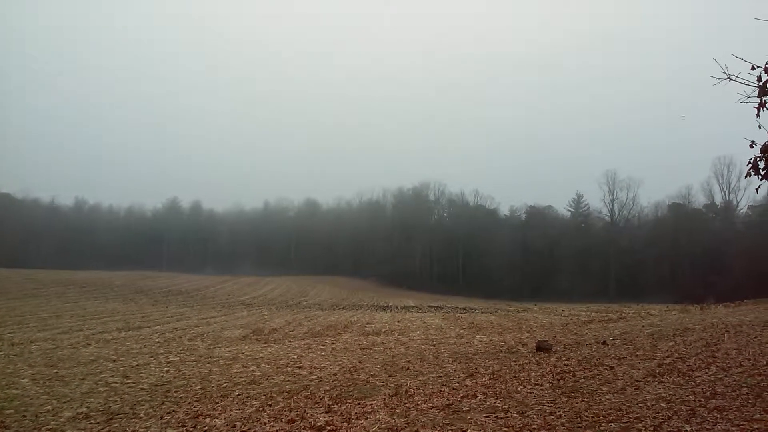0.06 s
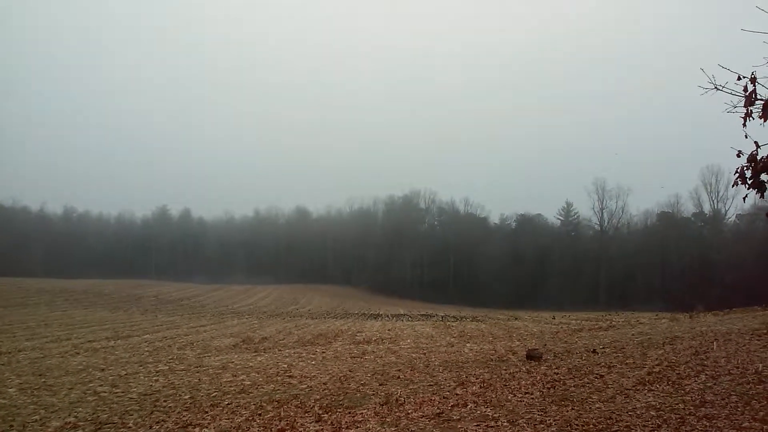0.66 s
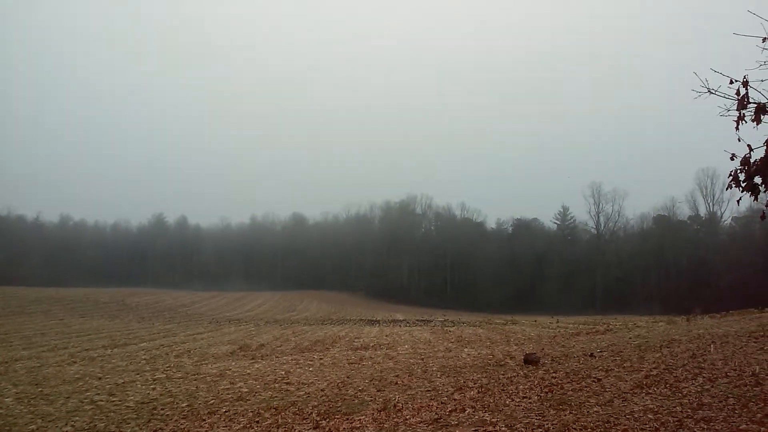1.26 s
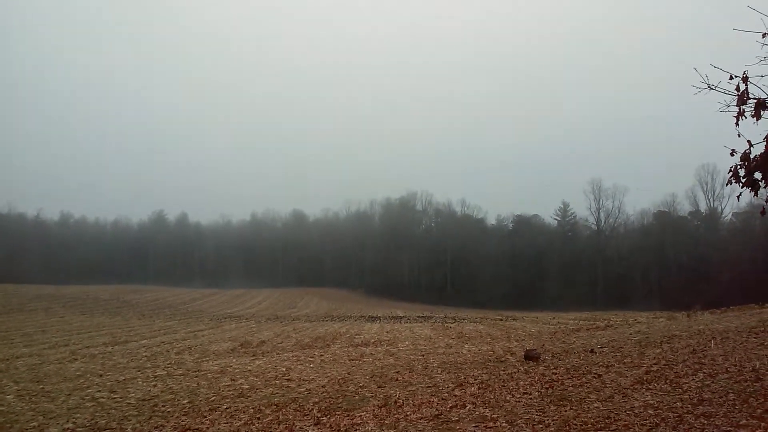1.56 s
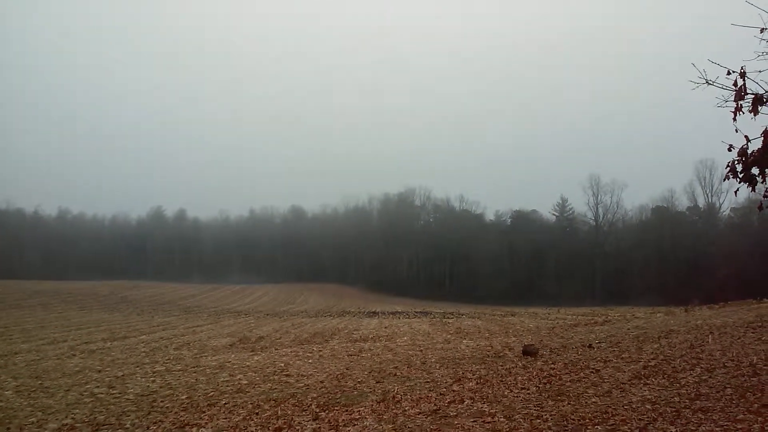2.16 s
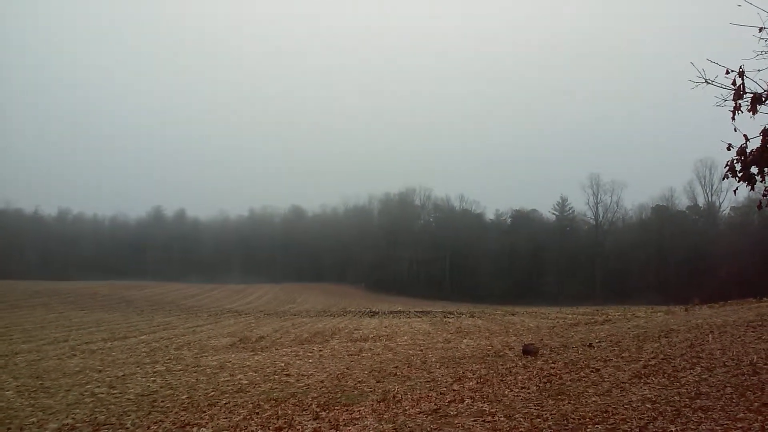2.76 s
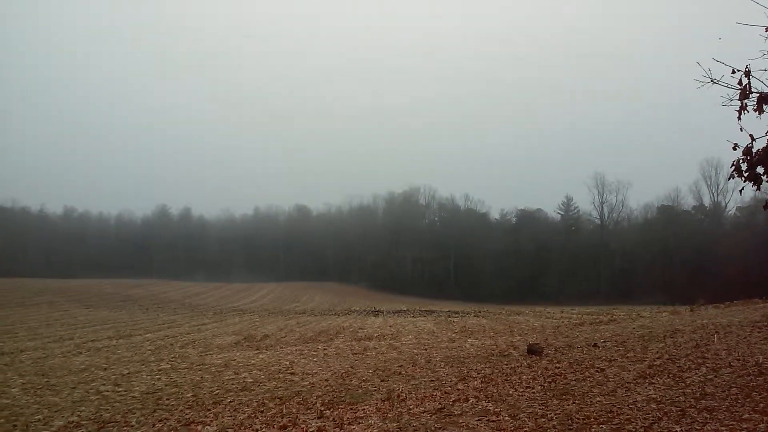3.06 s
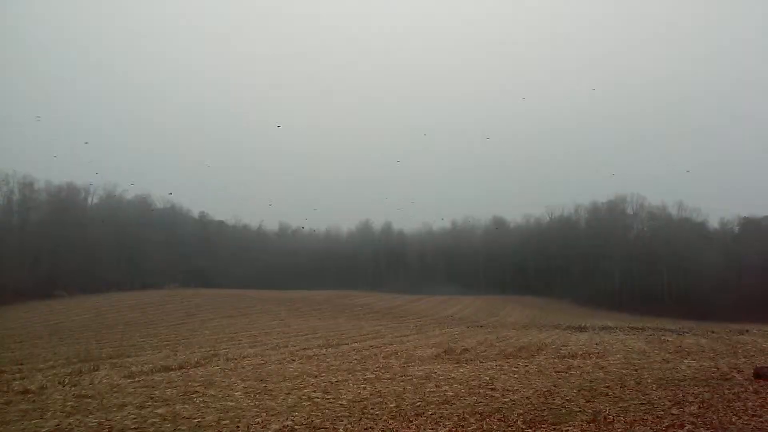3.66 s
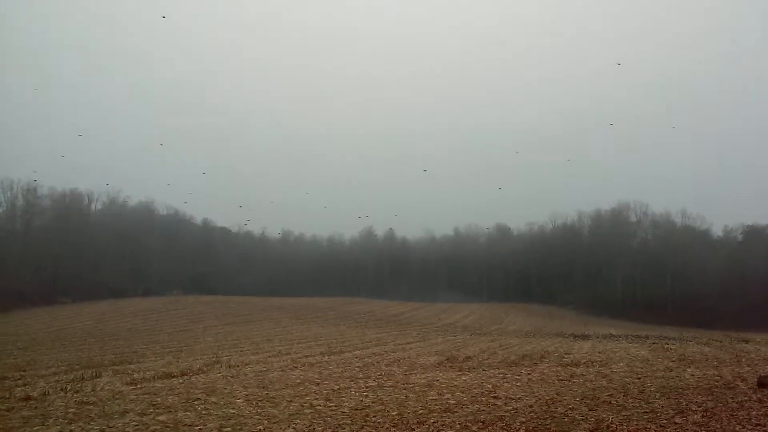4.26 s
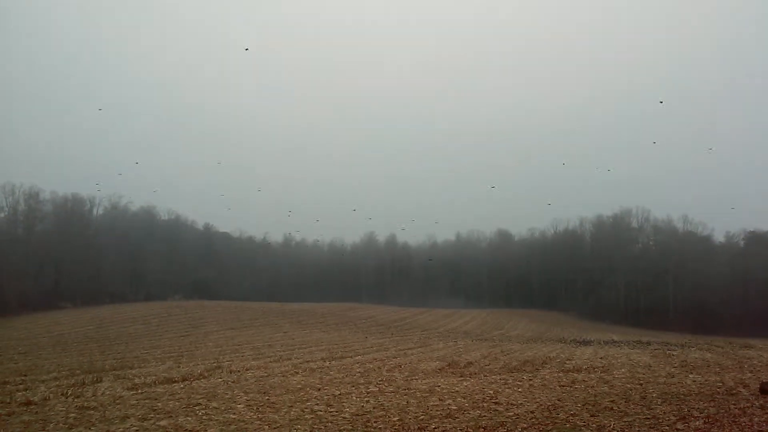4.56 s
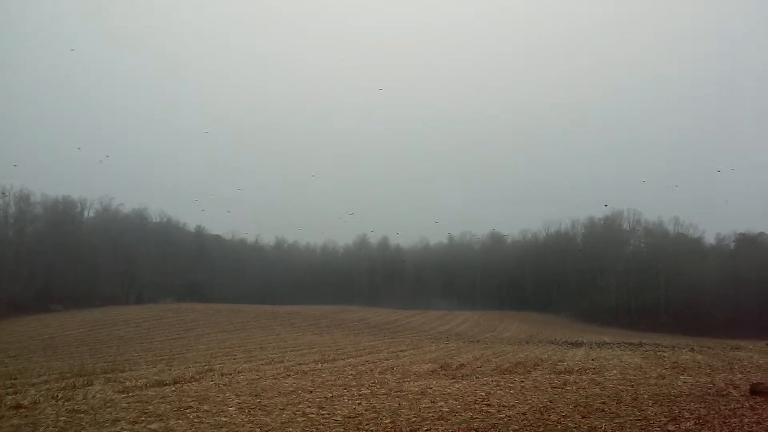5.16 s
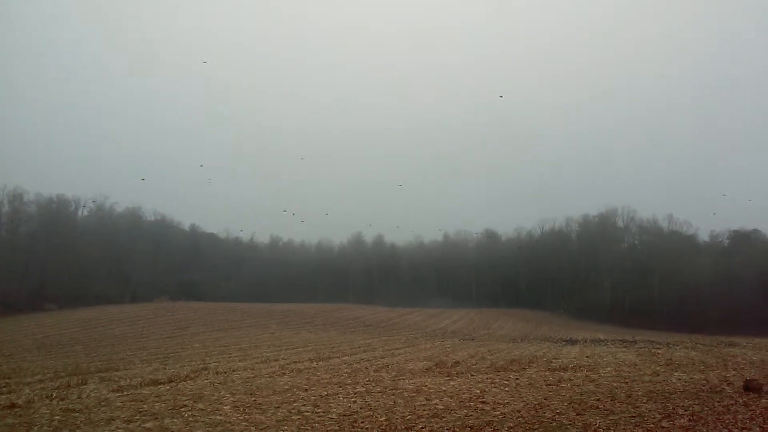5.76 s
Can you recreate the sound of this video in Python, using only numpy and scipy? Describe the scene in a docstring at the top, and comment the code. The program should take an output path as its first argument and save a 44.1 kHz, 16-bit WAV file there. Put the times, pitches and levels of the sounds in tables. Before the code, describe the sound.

A large flock of blackbirds chatters in the distance, with nearer whistles and raspy calls over a low, far engine hum.

```python
"""A foggy field ringed by trees, where a big flock of blackbirds chatters.
Hundreds of far chucks, creaks and thin squeaks blur into a wash; nearer whistles and buzzing cheks
stand out. Each call is a short glide, roughened by pitch flutter and scattered by the wood.
Underneath sit the hum of a far engine, short low thumps, a faint whine, soft far-off noise
and the hiss of a mono microphone."""
import sys
import numpy as np
from scipy import signal
from scipy.fft import rfft, irfft, next_fast_len
from scipy.io import wavfile
from scipy.ndimage import uniform_filter1d

SR = 44100
rng = np.random.default_rng(int(sys.argv[2]) if len(sys.argv) > 2 else 0)


def persist_wave(psi):
    """Save psi, clipped to +-1, as 16-bit WAV."""
    counts = np.round(np.clip(psi, -1, 1) * 32767).astype(np.int16)
    wavfile.write(sys.argv[1], SR, np.atleast_2d(counts).T)


N = 260631
TIME = np.arange(N) / SR
CUTOFF_HZ = 15800


def from_db(db):
    """Decibels to gain."""
    return 10 ** (np.asarray(db) / 20)


def rms_one(x):
    """Scale to an rms of 1."""
    return x / np.sqrt(np.mean(x ** 2) + 1e-20)


def steadied(x, size):
    """Hold the slow level at rms 1 over `size` samples; quicker flicker stays."""
    return x / np.sqrt(np.abs(uniform_filter1d(x ** 2, size=size)) + 1e-12)


def automation(rows):
    """Draw one lane per column through timed breakpoints."""
    times, *columns = np.transpose(rows)
    return [np.interp(TIME, times, column) for column in columns]


def drift(rate, size=N):
    """Random modulation with `rate` turns a second and a spread near 1."""
    at = np.arange(size) * rate / SR + rng.random()
    turns = int(at[-1]) + 2
    return np.interp(at, np.arange(turns), rng.normal(0, 1.2, turns))


def coloured(x, eq):
    """Pass a sound through an EQ curve; rms 1."""
    hz, db = np.transpose(eq)
    size = next_fast_len(N)
    bins = np.maximum(np.fft.rfftfreq(size, 1 / SR), 1)
    gain = from_db(np.interp(np.log(bins), np.log(hz), db))
    return rms_one(irfft(rfft(x, size) * gain, size)[:N])


def fade_in(at_s, length_s):
    """A ramp from 0 to 1 centred on a moment."""
    return np.clip((TIME - at_s) / length_s + .5, 0, 1)


def add(track, sound, at_s):
    """Mix a sound into a track, trimmed at both ends."""
    start = int(at_s * SR)
    first, last = max(start, 0), min(start + len(sound), len(track))
    if last > first:
        track[first:last] += sound[first - start:last - start]


def tone(hz, waver_hz, waver_rate):
    """A sine of rms 1 whose pitch wavers."""
    pitch = hz + waver_hz * drift(waver_rate)
    return np.sqrt(2) * np.sin(2 * np.pi * np.cumsum(pitch) / SR)


def chirp(length_s, start_hz, end_hz, rasp, rasp_hz=650, flutter_rate=900):
    """One call of rms 1: a gliding whistle, made raspy by fast pitch flutter."""
    size = max(int(length_s * SR), 64)
    along = np.linspace(0, 1, size)
    pitch = start_hz + (end_hz - start_hz) * along + rasp * rasp_hz * drift(flutter_rate, size)
    swell = np.sqrt(4 * along * (1 - along))
    return rms_one(swell * np.sin(2 * np.pi * np.cumsum(pitch) / SR))


def wood(call, t60, wet_db):
    """Trunks and branches return a different short train of fading echoes from each perch."""
    delay_s = np.arange(6000) / SR
    echoes = (rng.random(len(delay_s)) - .5) * from_db(-60 * delay_s / t60)
    echoes *= from_db(wet_db) / np.linalg.norm(echoes)
    echoes[0] = 1  # the direct sound
    return signal.fftconvolve(call, echoes / np.linalg.norm(echoes))


# EQ of the far voices: f/Hz, level/dB
VOICE_EQ = [(700, -7), (1400, -9.5), (2000, -6), (3000, -1), (3600, -4.5), (4200, -12), (5000, -14),
            (5800, -8.5), (6500, -3.5), (7600, 2), (8200, -2), (9000, -15), (10000, -22), (12000, -41)]


def far_calls(count, low_hz, high_hz, length_s, glide, rasp, spread_db, wet_db):
    """An even bed of birds calling at random, each at its own pitch and distance."""
    preroll = SR // 4
    track = np.zeros(N + preroll)
    birds = zip(rng.random((count, 4)), rng.standard_normal((count, 2)))
    for (when, pitch, size, harsh), (slope, nearness) in birds:
        hz = low_hz + (high_hz - low_hz) * pitch
        call = chirp(length_s * (.5 + size), hz, hz * (1 + glide * slope), rasp * harsh)
        gain = from_db(spread_db * min(nearness, 1.5))
        add(track, gain * wood(call, t60=0.97, wet_db=wet_db), when * len(track) / SR)
    return steadied(coloured(track[preroll:], VOICE_EQ), size=7000)


# Fader rides on the flock's lower calls: t/s, chuck level/dB, creak level/dB
CHATTER_RIDE = [(0, -49, -60), (.72, -52.7, -60), (1.08, -49.5, -60.5), (1.36, -51, -65),
                (1.72, -49.5, -59), (2.44, -50.5, -62.5), (2.78, -52, -60), (3.8, -50, -58.5),
                (4.12, -47.7, -53.5), (4.55, -48.7, -57.5), (4.95, -45.5, -50.5), (5.3, -47, -56.5),
                (5.6, -48.5, -52.5), (5.91, -46, -55.5)]
# Treble ride, moving the squeaks, stray birds and hiss: t/s, level/dB
TREBLE_RIDE = [(0, -44.3), (.5, -46.5), (.94, -44.3), (1.25, -47), (2.05, -45.5), (2.6, -47.5),
               (2.75, -57.5), (2.85, -57.5), (2.98, -49.5), (3.42, -46.5), (3.9, -49), (4.5, -45.5),
               (4.64, -51), (4.92, -45.7), (5.2, -46.5), (5.38, -52), (5.6, -44.5), (5.91, -44.5)]


def flock():
    """The wash: low chucks and mid creaks, with thin squeaks coming and going on top."""
    chucks_db, creaks_db = automation(CHATTER_RIDE)
    treble_db, = automation(TREBLE_RIDE)
    chucks = far_calls(count=1700, low_hz=1398, high_hz=4312, length_s=.018,
                       glide=0.0703, rasp=0.598, spread_db=2.5, wet_db=2)
    creaks = far_calls(count=750, low_hz=3909, high_hz=6290, length_s=.03,
                       glide=0.04, rasp=0.882, spread_db=3, wet_db=6)
    squeaks = far_calls(count=2400, low_hz=6222, high_hz=11530, length_s=.02,
                        glide=0.0404, rasp=0.688, spread_db=2, wet_db=4.5)
    return (from_db(chucks_db - 0.77) * chucks
            + from_db(creaks_db + 1.8) * creaks
            + from_db(treble_db - 0.4) * squeaks)


def treble_swing():
    """How far the treble ride stands above its mean, in dB."""
    db, = automation(TREBLE_RIDE)
    return db - db.mean()


# Fader ride on the engine drone: t/s, level/dB
DRONE_RIDE = [(0, -55), (.5, -55), (.78, -60), (1.03, -52), (1.32, -60.5), (1.9, -50.5), (2.95, -59),
              (3.1, -54), (3.42, -50.5), (3.76, -57.5), (4.1, -65), (4.21, -56), (4.39, -64), (4.66, -48.5),
              (4.92, -60), (5.03, -53), (5.3, -57.5), (5.91, -65)]
# Drone EQ before and after its pitch drops: f/Hz, level/dB
DRONE_HIGH_EQ = [(16, -64), (28, -28), (40, -42), (51, -3), (80, -4.5), (112, 3.5), (132, -4), (162, -15.5),
                 (210, -20.5), (241, -22.5), (269, -20), (300, -24), (390, -53), (660, -120)]
DRONE_LOW_EQ = [(16, -51), (28, -33), (51, -6), (86, 1.5), (104, -2), (124, -18), (140, -10.5),
                (156, -14.5), (172, -9), (206, -19.5), (253, -34), (300, -21), (390, -28), (660, -120)]
# Held engine tones: start t/s, end t/s, f/Hz, level/dB
ENGINE_TONES = [(.9, 3.452, 122.5, -62), (1.498, 3.503, 107.9, -64.5), (1.89, 2.996, 241.4, -71.5),
                (4.5, 5.946, 89.95, -62), (4.802, 5.955, 170.8, -66.5)]
PITCH_DROP_S = 3.72


def engine_hum(swell_db=2.57, swells_per_s=12):
    """A far engine: an uneven noise drone that crossfades to a lower pitch, plus wavering tones."""
    dropped = fade_in(PITCH_DROP_S, 0.048)
    high = coloured(rng.standard_normal(N), DRONE_HIGH_EQ)
    low = coloured(rng.standard_normal(N), DRONE_LOW_EQ)
    drone = steadied(np.sqrt(1 - dropped) * high + np.sqrt(dropped) * low, size=5000)
    ride_db, = automation(DRONE_RIDE)
    track = from_db(ride_db - 1 + swell_db * drift(swells_per_s)) * drone
    for start_s, end_s, hz, db in ENGINE_TONES:
        gate = fade_in(start_s, 0.083) * (1 - fade_in(end_s, 0.14))
        track += from_db(db + 2.4 * drift(8.5)) * gate * tone(hz, waver_hz=2.08, waver_rate=12)
    return track


# Fader ride on the distant bed: t/s, level/dB
DISTANCE_RIDE = [(0, -61.8), (1.35, -63), (1.65, -58.5), (2.6, -58.6), (3.9, -59), (5.0, -56), (5.91, -55)]
# EQ of the far-off noise: f/Hz, level/dB
DISTANCE_EQ = [(20, 3), (150, 1.5), (260, -4.5), (420, -3.5), (600, 0), (850, 2.5), (1300, 0), (1800, 1.5),
               (3000, -1), (6000, -31)]


def distant_bed():
    """Soft far-off noise and the flock's faintest low gurgles, slowly building together."""
    ride_db, = automation(DISTANCE_RIDE)
    noise = coloured(rng.standard_normal(N), DISTANCE_EQ)
    gurgles = far_calls(count=380, low_hz=697.4, high_hz=1554, length_s=0.029,
                        glide=0.0494, rasp=0.19, spread_db=7, wet_db=-3)
    return from_db(ride_db + 3) * noise + from_db(ride_db - 3.3) * gurgles


# Nearly flat EQ of the hiss: f/Hz, level/dB
HISS_EQ = [(1000, 0.15), (10000, 0.82), (13000, 0), (16000, 0.15)]


def microphone_hiss(base_db=-62.5, treble_share=.6, sink_db=2.5):
    """Microphone hiss that partly follows the treble ride and sinks midway."""
    db = base_db + treble_share * treble_swing() - sink_db * fade_in(at_s=2.9, length_s=.12)
    return from_db(db) * coloured(rng.standard_normal(N), HISS_EQ)


# Short low thumps in the rumble: t/s, level/dB
THUMP_CUES = [(.04, -45), (.196, -44), (1.013, -40), (1.057, -42), (1.19, -43), (1.843, -40),
              (2.052, -41.5), (2.237, -42), (3.061, -40), (3.131, -37.5), (3.219, -38), (3.339, -42),
              (4.2, -48), (4.68, -38), (5.087, -43)]


def low_thumps(high_hz=105, low_hz=95.3, width_s=.014, trim_db=-1.8):
    """Short low thumps in the rumble, each a few cycles of a sine; the later ones sit lower."""
    track = np.zeros(N)
    for at_s, db in THUMP_CUES:
        hz = high_hz if at_s < PITCH_DROP_S else low_hz
        envelope = np.exp(-((TIME - at_s) / width_s) ** 2)
        track += from_db(db + trim_db) * envelope * np.cos(2 * np.pi * (hz * TIME + rng.random()))
    return track


# Harsh "chek" calls: t/s, length/s, start f/Hz, end f/Hz, level/dB, rasp/0-1
CHEK_CUES = [(.05, 0.095, 1500, 1480, -50, 0.2), (0.801, 0.036, 1310, 1290, -58, 0.8),
             (1.579, 0.044, 810, 756, -57, 0.76), (1.986, 0.067, 1394, 1400, -57, 0),
             (2.416, 0.043, 976, 950, -54, 0.57), (2.575, 0.022, 1114, 1034, -52, 0.98),
             (3.404, 0.039, 1524, 1527, -47.5, 0.24), (3.674, 0.033, 1256, 1266, -58, 0.3),
             (3.819, .065, 1330, 1254, -49.5, 0.1), (4.438, 0.025, 1105, 1100, -53, 0.55),
             (5.61, 0.034, 897, 866, -55, 0.7), (5.864, 0.078, 1118, 1083, -46, 0.3)]
# The birds' throat resonances: f/Hz, level/dB
THROAT_EQ = [(1000, -21), (3200, -8.5), (5000, -16), (6500, -7), (7700, -2), (9000, -11), (10500, -18),
             (12500, -29), (15000, -35)]


def cheks():
    """A buzzing voice: an unsteady, mostly falling pitch with harmonics shaped by the throat."""
    track = np.zeros(N)
    throat_hz, throat_db = np.transpose(THROAT_EQ)
    for at_s, length_s, start_hz, end_hz, db, rasp in CHEK_CUES:
        voice = signal.hilbert(chirp(length_s, start_hz, end_hz, rasp, rasp_hz=179))
        harmonics = np.arange(1, CUTOFF_HZ // start_hz)
        gains = from_db(np.interp(harmonics * start_hz, throat_hz, throat_db))
        offsets = rng.uniform(0, 2 * np.pi, (len(gains), 1))
        buzz = gains @ np.cos(np.outer(harmonics, np.angle(voice)) + offsets)
        call = rms_one(np.abs(voice) * buzz)
        add(track, from_db(db) * wood(call, t60=0.24, wet_db=-3), at_s)
    return track


# Foreground calls: t/s, length/s, f/Hz, level/dB, rasp/0-1
NEAR_CUES = [(0.128, 0.035, 6850, -39, 0.36), (0.199, 0.049, 4420, -54, 0.24),
             (.502, .045, 4845, -57.5, 0.05), (0.59, 0.051, 4370, -52, 0.12),
             (.758, 0.017, 6800, -44.5, 0.26), (0.909, 0.035, 6670, -43.5, .18),
             (0.915, .17, 3280, -50.5, 0.23), (1.067, 0.092, 8500, -49.5, 0.36),
             (1.084, 0.094, 2580, -49, 0.06), (1.582, 0.036, 3160, -48.5, .2), (1.73, 0.046, 8520, -52, 0),
             (1.877, 0.051, 6440, -50, .2), (2.047, 0.064, 4030, -51.5, 0.5), (2.191, .03, 4450, -54, 0.1),
             (2.41, 0.037, 7040, -45.5, .3), (2.417, 0.034, 3360, -49, 0.46), (2.447, .04, 6550, -49, 0.06),
             (2.498, .07, 4280, -55, .12), (3.003, 0.065, 8300, -52.5, .3), (3.258, 0.16, 8170, -56, 0.33),
             (3.471, .055, 3085, -47.5, 0.16), (3.55, 0.055, 6470, -50, 0.23), (3.555, .024, 2360, -45, .1),
             (3.82, 0.063, 7850, -38.5, 0.42), (3.853, 0.065, 4460, -53, 0.16),
             (3.937, 0.057, 10100, -57.5, 0.6), (3.967, .043, 5180, -51, 0.45),
             (4.07, 0.048, 4870, -48.5, 0.25), (4.215, 0.033, 7280, -44, .28),
             (4.341, 0.029, 3370, -45, 0.1), (4.404, 0.069, 7250, -49, .05), (4.88, 0.018, 2810, -43, .35),
             (4.912, 0.025, 1960, -46, .2), (4.927, 0.038, 8350, -49.5, 0.02),
             (5.027, 0.11, 9130, -55.5, .2), (5.137, 0.073, 2670, -46.5, 0.3),
             (5.166, 0.053, 8560, -47, 0.15), (5.46, 0.038, 3980, -41.5, 0.24),
             (5.528, 0.073, 4160, -43, 0.26), (5.598, 0.086, 7600, -42.5, 0.1),
             (5.692, 0.047, 2800, -49, 0.22), (5.86, 0.053, 7880, -42, 0.3)]
GLIDE = 0.0149  # typical slide to either side of a call's pitch, as a share of it


def near_birds(trim_db=-1, octave_db=-24):
    """Single whistles and rasps from closer birds; the lower ones carry a weak octave."""
    track = np.zeros(N)
    slides = GLIDE * rng.standard_normal(len(NEAR_CUES))
    for (at_s, length_s, hz, db, rasp), slide in zip(NEAR_CUES, slides):
        start_hz, end_hz = hz * (1 - slide), hz * (1 + slide)
        call = chirp(length_s, start_hz, end_hz, rasp)
        if start_hz < SR / 8:
            call += from_db(octave_db) * chirp(length_s, 2 * start_hz, 2 * end_hz, rasp)
        add(track, from_db(db) * wood(call, t60=0.49, wet_db=0.5), at_s)
    return from_db(trim_db) * track


def stray_birds(count=48, low_hz=3505, high_hz=12030, length_s=.035, base_db=-58, db_per_octave=-6.5):
    """Mid-distance birds pipe up at random, weaker the higher they call."""
    track = np.zeros(N)
    for when, pitch, size, slope in rng.random((count, 4)):
        hz = low_hz * (high_hz / low_hz) ** pitch
        slide = 2 * GLIDE * (2 * slope - 1)
        call = chirp(length_s * (.5 + size), hz * (1 - slide), hz * (1 + slide), rasp=0.39)
        db = base_db + db_per_octave * np.log2(hz / low_hz)
        add(track, from_db(db) * wood(call, t60=0.41, wet_db=-1), when * N / SR)
    return from_db(treble_swing()) * track


# Spells of the whine, about three a second: centre t/s, level/dB
WHINE_CUES = [(.3, -71), (.48, -71), (.72, -74), (1.37, -72), (1.69, -66), (2.04, -68), (2.32, -65.5),
              (2.64, -68.5), (2.95, -64.5), (3.24, -69), (3.62, -63.5)]


def whine(hz=506.4, spell_s=0.17, edge_s=.08, trim_db=-0.1, flicker_db=2.3):
    """A thin, unsteady tone that fades in and out in spells of equal length."""
    spells = np.zeros(N)
    for centre_s, db in WHINE_CUES:
        attack = fade_in(centre_s - spell_s / 2, edge_s)
        release = 1 - fade_in(centre_s + spell_s / 2, edge_s)
        spells += from_db(db) * attack * release
    flicker = from_db(trim_db + flicker_db * drift(30.34))
    return flicker * spells * tone(hz, waver_hz=4.72, waver_rate=39.92)


def scene():
    """Birds over the low end and the beds; one microphone feeds both channels."""
    birds = flock() + near_birds() + stray_birds() + cheks()
    mix = birds + engine_hum() + low_thumps() + whine() + distant_bed() + microphone_hiss()
    return np.tile(mix, (2, 1))


def record(dry, low_cut_hz=37):
    """Roll off the deepest bass and cut the top steeply."""
    low_cut = signal.butter(4, low_cut_hz, "high", fs=SR, output="sos")
    high_cut = signal.ellip(12, .1, 70, CUTOFF_HZ, fs=SR, output="sos")
    return signal.sosfilt(high_cut, signal.sosfilt(low_cut, dry))


dry = scene()
out = record(dry)
persist_wave(out)
```